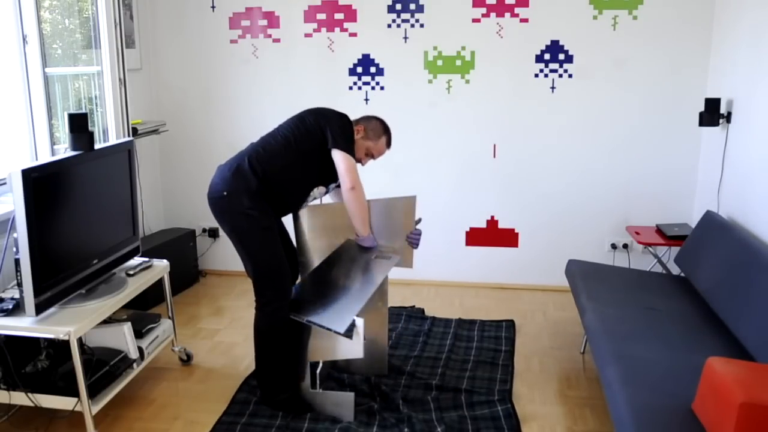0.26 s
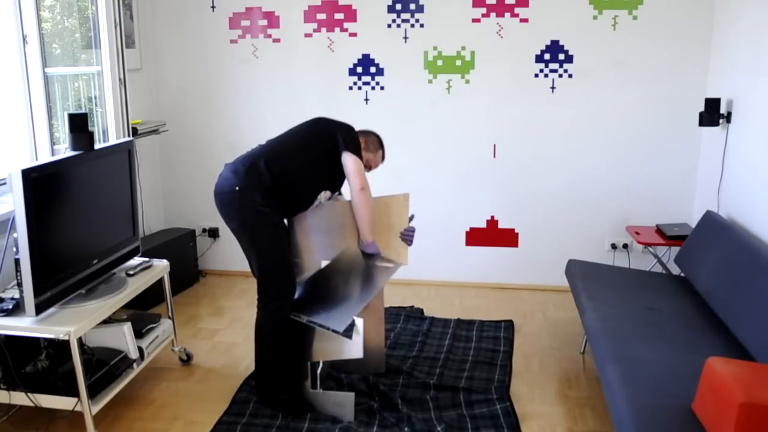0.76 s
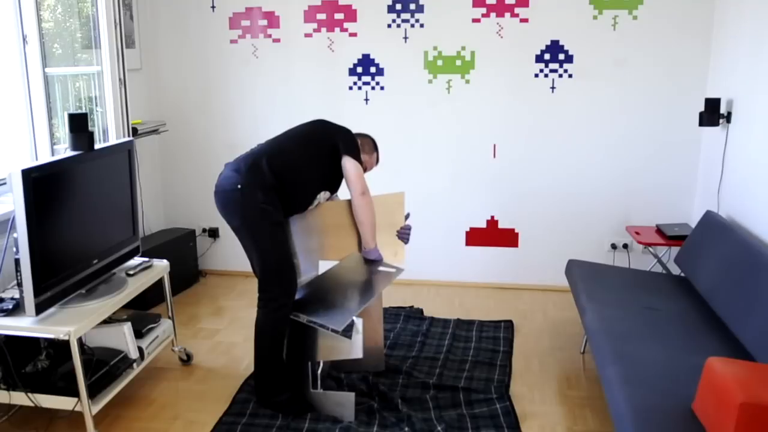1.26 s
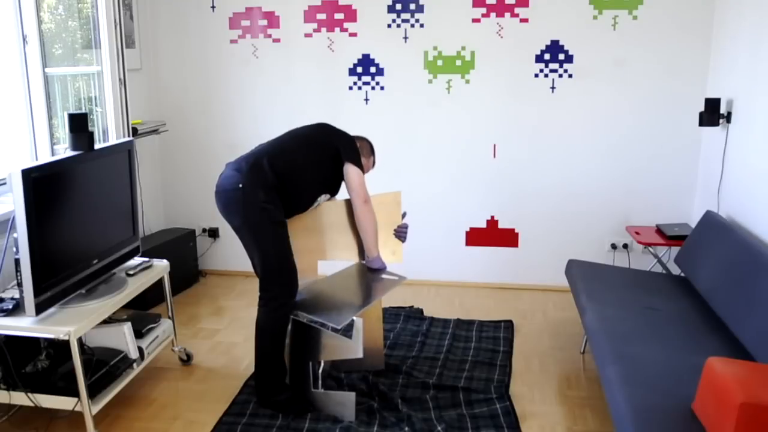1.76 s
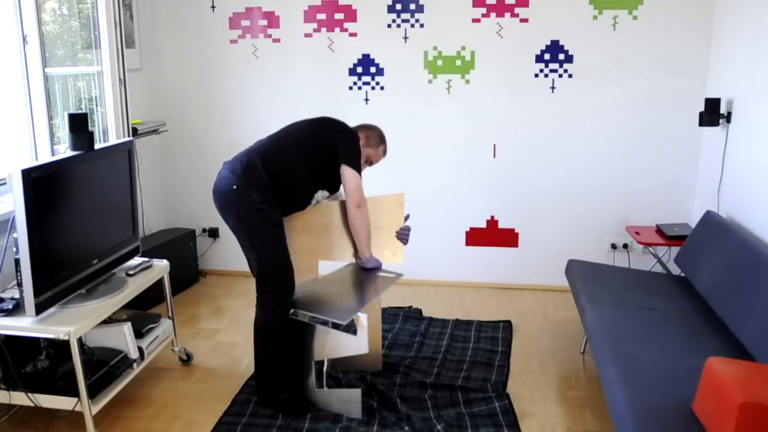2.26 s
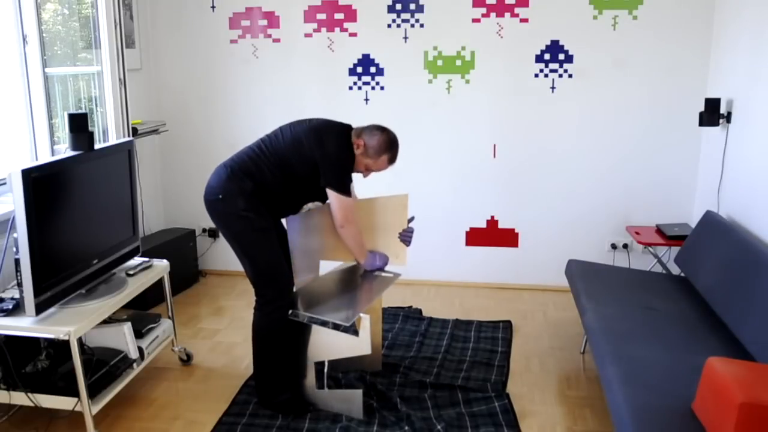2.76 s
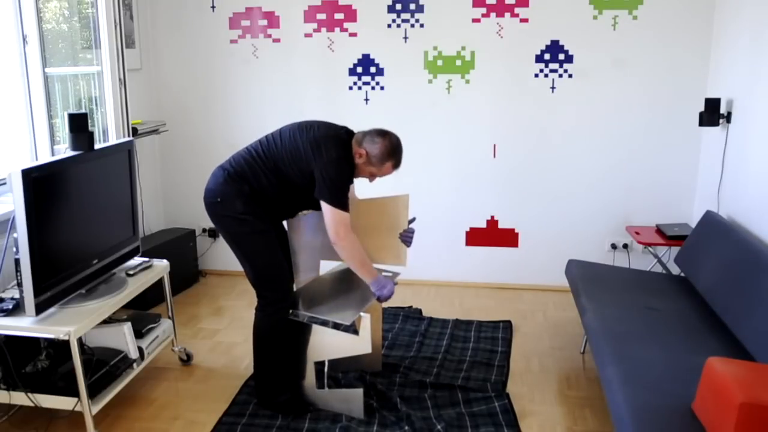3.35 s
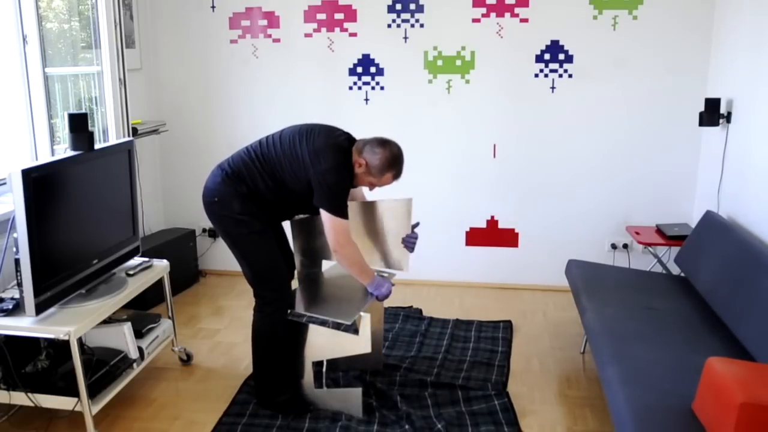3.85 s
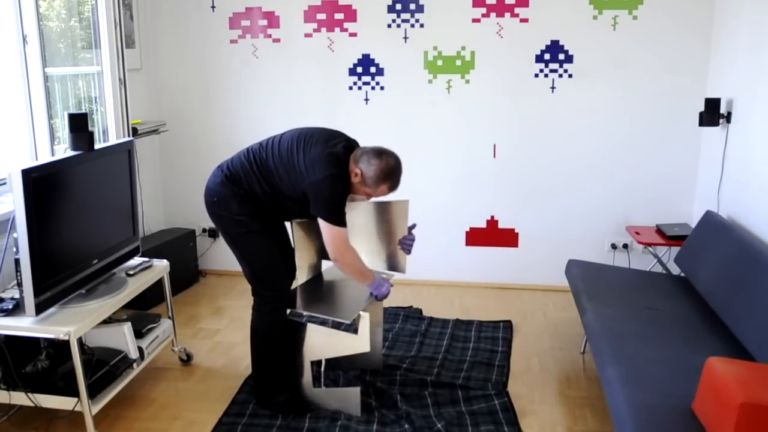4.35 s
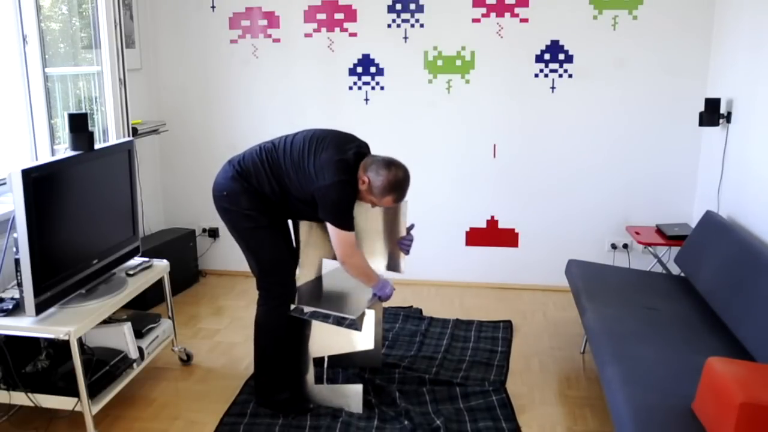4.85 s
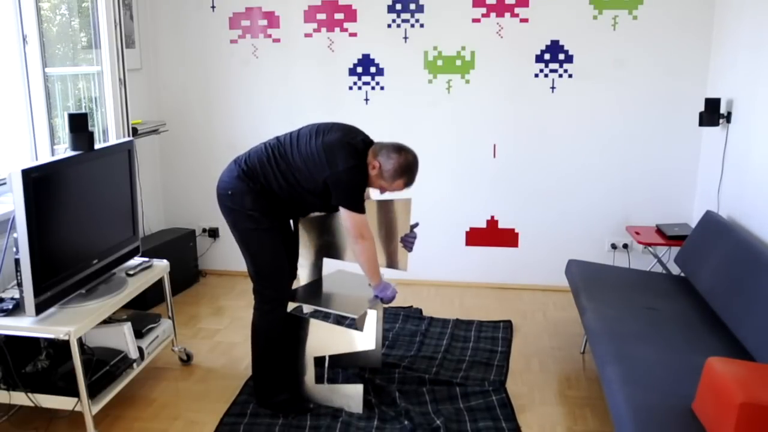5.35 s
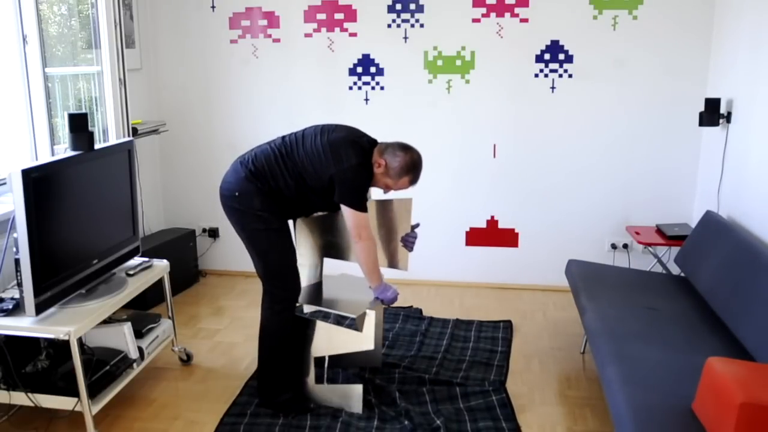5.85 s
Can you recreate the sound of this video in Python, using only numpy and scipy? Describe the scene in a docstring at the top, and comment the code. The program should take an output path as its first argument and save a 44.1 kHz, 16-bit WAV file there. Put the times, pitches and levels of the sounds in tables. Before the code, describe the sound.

A quiet room with a soft constant hush. Metal edges rub and catch in dry, uneven strokes while bending sheets click, pop and knock, each ringing for under half a second. Activity is light for the first second and a half, becomes irregular clanks, thins around four seconds, then builds to clustered knocks and loud closing bangs. The microphone sounds dull, mono and overloaded on peaks.

```python
"""A light scrape and a faint snap come first: thin sheet-metal panels bent and slid by hand in a living room.
Stick-slip friction scrapes the edges, and buckling snaps, knocks and at last hard bangs strike the sheets.
Both forces ring resonators (the clear modes) and decaying noise bands (the dense modes).
Noise bands make the low wobble of whole panels and the steady room hush.
A low-rate recorder dulls the treble, leaks a faint mirror of the band above it and clips the peaks."""
import sys
import numpy as np
from scipy import signal
from scipy.fft import rfft, irfft, next_fast_len
from scipy.io import wavfile

SR = 44100
rng = np.random.default_rng(int(sys.argv[2]) if len(sys.argv) > 2 else 0)


def how_loud(loudness_db):
    """Turn decibels into a plain amplitude multiplier (0 dB gives 1, 20 dB gives 10)."""
    steps = np.asarray(loudness_db, float) / 20
    return 10 ** steps


def log_audio(samples):
    """Write samples as a 16-bit WAV file to the path given in sys.argv[1]."""
    # one column per channel
    frames = np.atleast_2d(samples).T
    # limit to full scale, then quantise
    limited = np.clip(frames, -1, 1)
    pcm = np.round(limited * 32767).astype(np.int16)
    wavfile.write(sys.argv[1], SR, pcm)


N = 269451   # length [samples]
HOP = 64   # samples between envelope points
MIDDLE_HZ = 1185   # pitch at which boom and edge settings have no effect

# Impulses of buckling sheets, snaps and knocks: (time [s], relative peak [dB], boom re peak [dB],
# edge re peak [dB], favoured low pitch [Hz], favoured high pitch [Hz])
BLOWS = [(.049, -27.5, -3, 2, 344, 1855), (.347, -26.5, -2.5, -5, 442, 2560),
         (.469, -19, -7.5, -9.5, 1855, 2180), (1.131, -31, -4, -4.5, 1160, 1855),
         (1.416, -29, -0.5, 5, 293, 2090), (1.631, -11, -15, -12.5, 1160, 2200),
         (1.88, -13, -10.5, -6.5, 320, 1190), (2.16, -3.5, -11, -17.5, 760, 1160),
         (2.559, -23.5, -19, -2.5, 764, 1470), (2.61, -18.5, -1, -12, 490, 780),
         (2.705, -15.5, 2, 5.5, 1240, 1796), (2.884, -17.5, -2.5, -3, 260, 1275),
         (2.997, -10, -5, -10, 260, 950), (3.055, -21, 2, -18.5, 344, 854),
         (3.169, -33.5, -23, -0.5, 854, 3170), (3.234, -29, -3, -7, 453, 2850),
         (3.458, -19.5, 1.5, 7, 390, 1820), (3.62, -10.5, -19, -1.5, 596, 1276),
         (4.006, -35.5, 3.5, 12, 294, 3170), (4.14, -32.5, -4.5, 3.5, 738, 2110),
         (4.203, -23.5, 3.5, -10, 390, 666), (4.357, -6.5, -8, -11.5, 450, 1308),
         (4.554, -20, -2, -2.5, 400, 2290), (4.782, -2.5, -13.5, -1, 657, 1460),
         (4.94, -2.5, -5, -10, 312, 865), (5.036, -1.5, -1.5, -12.5, 442, 600),
         (5.627, -16, 9, -5.5, 440, 2300), (5.673, 6.5, -8, -11, 739, 1855),
         (5.888, 4.5, -6, -20, 950, 1486)]


def unit_rms(x):
    """Normalisation: divide a signal by the root of its mean power."""
    return x / np.sqrt(np.mean(x ** 2) + 1e-20)


def at_hz(points, hz, column=1):
    """Spectral interpolation: read a table column on a log-frequency axis."""
    points = np.array(points)
    return np.interp(np.log(hz), np.log(points[:, 0]), points[:, column])


def drift(step_s):
    """Slow random modulation: straight lines between random values one step apart."""
    return np.interp(np.arange(N) / SR / step_s, np.arange(400), rng.standard_normal(400))


def tilt_db(hz, boom_db, edge_db):
    """Spectral tilt: boom weights the low modes, edge the high ones, both fading out toward the middle."""
    boom_hz, edge_hz = 270, 3330   # full effect from here outward
    low = np.clip(np.log(MIDDLE_HZ / hz) / np.log(MIDDLE_HZ / boom_hz), 0, 1)
    high = np.clip(np.log(hz / MIDDLE_HZ) / np.log(edge_hz / MIDDLE_HZ), 0, 1)
    return low * boom_db + high * edge_db


def swell(s, held_s, up_db_per_s, down_db_per_s):
    """Exponential growth and decay of power, one row an event: rises to 1, holds, fades."""
    t = np.arange(0, N, HOP) / SR - np.asarray(s)[:, None]
    rise_db = up_db_per_s * np.minimum(t, 0)
    fall_db = down_db_per_s * np.maximum(t - held_s, 0)
    return how_loud(2 * (rise_db - fall_db))


def summed_db(level_db, swells, floor_db):
    """Incoherent addition: powers add at each envelope point, with the level in dB joined by straight lines."""
    power = how_loud(2 * level_db) @ swells + how_loud(2 * floor_db)
    return np.interp(np.arange(N), np.arange(0, N, HOP), 10 * np.log10(power))


def stick_slip():
    """Stick-slip friction: dense uneven slips of one edge over the other sheet, of either sign."""
    slips_per_s, spread_db = 2200, 3
    sizes = how_loud(spread_db * np.minimum(rng.exponential(1, N), 5))
    signs = rng.choice([-1, 1], N)
    slipping = rng.random(N) < slips_per_s / SR
    return unit_rms(sizes * signs * slipping)


def rub_db(hz):
    """Friction grows with pressure: strokes, chatter after blows and light resting contact at one pitch."""
    # Scraping strokes: (time of full pressure [s], held [s], relative level at the middle pitch [dB],
    # boom re level [dB], edge re level [dB])
    strokes = [(0, 0.063, -31.5, -3.5, 6), (.28, .02, -33.5, -10, 0.5), (.5, 0.34, -31.5, -13, 3),
               (0.788, 0.023, -19, -15.5, 5.5), (0.908, 0.019, -20, -14, 2), (0.971, 0.15, -25.5, -11, 3.5),
               (1.108, 0.017, -20.5, -13.5, -2), (1.32, 0.014, -31, -9, -1.5), (1.499, 0.056, -20, -20, 1),
               (1.608, 0.072, -17, -11.5, 3.5), (1.808, 0.034, -15.5, -5, -1), (2.249, 0.027, -21, -3, 0),
               (2.38, 0.024, -33.5, 0.5, -6), (2.619, 0.028, -24.5, 0.5, -9.5),
               (2.728, 0.028, -16.5, -15, -4), (3.06, 0.039, -22, -10, -31), (3.599, 0.042, -12, -11, 0.5),
               (3.77, .02, -24.5, -5, -0.5), (3.85, 0.048, -30.5, -5, -0.5), (4.22, 0.15, -32, -3, -3.5),
               (4.58, 0.016, -25.5, 1.5, 2.5), (4.65, 0.066, -29.5, -4.5, 1.5), (4.85, 0.11, -14.5, -3, -5),
               (5.168, 0.013, -17, -1, -3), (5.652, 0.025, -13, 0, -3.5), (5.684, 0.058, -1.5, -10, -3),
               (5.9, 0.045, -4.5, -5, -10.5)]
    press_s, let_go_db_per_s = 0.11, 113.5   # a stroke swells from rest in a set time, holds and eases off
    chatter_db, chatter_db_per_s = -6.5, 119   # after a blow the edges chatter: level re the blow, fading
    resting_db = -44   # the sheets always touch lightly
    s, held_s, level_db, boom_db, edge_db = np.transpose(strokes)
    blow_s, peak_db, blow_boom_db, blow_edge_db = np.transpose(BLOWS)[:4]
    press_db_per_s = (level_db[:, None] - resting_db) / press_s
    stroke_swells = swell(s, held_s[:, None], press_db_per_s, let_go_db_per_s)
    chatter_swells = swell(blow_s, 0, 1e5, chatter_db_per_s)   # all but instant rise
    stroke_db = level_db + tilt_db(hz, boom_db, edge_db)
    after_blow_db = peak_db + chatter_db + tilt_db(hz, blow_boom_db, blow_edge_db)
    return summed_db(np.r_[stroke_db, after_blow_db], np.r_[stroke_swells, chatter_swells], resting_db)


def rub_force(hz, slips):
    """Amplitude modulation: the stick-slip force as felt at one pitch."""
    return slips * how_loud(rub_db(hz))


def blow_force(hz, extra_db):
    """Impulsive excitation: one single-sample impulse a blow, weighted for one pitch."""
    s, peak_db, boom_db, edge_db = np.transpose(BLOWS)[:4]
    force = np.zeros(N)
    force[np.round(s * SR).astype(int)] = how_loud(peak_db + tilt_db(hz, boom_db, edge_db) + extra_db)
    return force


def favoured(hz, octaves):
    """Selective excitation: how near a pitch lies to those each blow favours, 0-1."""
    distance = np.log2(hz / np.array(BLOWS)[:, 4:]) / octaves
    return np.exp(-.5 * distance ** 2).max(axis=1)


def clear_modes(slips):
    """Modal resonance: scraping and blows ring the same modes; each snap's bend frees some until the next."""
    # The clearest sheet modes: (frequency [Hz], relative level [dB], t60 [s])
    sheet_modes = [(261, -13.5, 0.49), (317, -5, 0.53), (344, -12.5, 0.26), (442, -4.5, 0.43),
                   (596, -4, 0.32), (670.6, -7, 0.24), (739, -1.5, 0.37), (854, -10.5, 0.43),
                   (951, -3, 0.51), (1160, -3, 0.21), (1180, -5.5, 0.35), (1256, 0.5, 0.11),
                   (1396, -6, 0.31), (1486, 0.5, 0.15), (1627, -4, 0.33), (1781, 3, 0.097),
                   (1855, -6, 0.18), (1937, -6, 0.22), (2110, -2.5, 0.21), (2560, -19.5, 0.12),
                   (2680, -4, 0.12), (3170, -4.5, 0.16), (3296, -7.5, 0.25), (3740, -18.5, 0.14),
                   (4004, -8, 0.1)]
    rub_gain_db, blow_gain_db, strike_spread_db = -6.5, -22.5, 0.5
    free_rub_db, free_blow_db, free_octaves = 6, 16.5, 0.026
    clang = 0.12   # harder pushes ring these modes more, dB per dB of scraping level
    out = np.zeros(N)
    chance = rng.standard_normal((len(BLOWS), len(sheet_modes)))
    latest = np.maximum(np.searchsorted(np.array(BLOWS)[:, 0], np.arange(N) / SR) - 1, 0)
    clang_db = clang * (rub_db(MIDDLE_HZ) + 13.5)
    for k, (hz, level_db, t60) in enumerate(sheet_modes):
        radius = how_loud(-60 / (t60 * SR))
        angle = 2 * np.pi * hz / SR
        free = favoured(hz, free_octaves)
        rubbed = np.sqrt(1 - radius) * rub_force(hz, slips)   # keeps the steady level apart from t60
        rubbed *= how_loud(rub_gain_db + free_rub_db * free[latest] + clang_db)
        struck = blow_force(hz, blow_gain_db + free_blow_db * free + strike_spread_db * chance[:, k])
        feed = [0, how_loud(level_db) * np.sin(angle)]
        feedback = [1, -2 * radius * np.cos(angle), radius * radius]
        out += signal.lfilter(feed, feedback, rubbed + struck)
    return out


def wash(slips):
    """High modal density: modes too close to tell apart answer as decaying noise in third-octaves."""
    # Countless close modes of sheets and room: (frequency [Hz], relative colour [dB], t60 [s])
    dense_modes = [(110, -18, 1), (165.4, 1.5, 0.44), (300, 5.5, 0.4), (600, 2, 0.41), (1170, -3.5, 0.65),
                   (2390, 0, 0.32), (3010, -4.5, 0.26), (5250, -20, 0.5)]
    blow_gain_db, favour_db, favour_octaves = 30.5, 3, 0.096
    first_snap, snap_s = 0.52, 0.023   # extra onset of each answer, and its decay time
    patch_s, patchy_db = .04, 2.5   # the edge catches unevenly at each pitch
    shapes, bend_s = 3, .25   # bending crossfades from one set of modes to the next
    out = np.zeros(N)
    edges = 90 * 2 ** np.arange(0, 6.2, 1 / 3)
    t = np.arange(SR // 2) / SR
    white = rng.standard_normal((2, shapes, len(t)))
    turn = np.arange(N) / SR / bend_s - np.arange(shapes)[:, None]
    away = np.abs((turn + shapes / 2) % shapes - shapes / 2)
    share = np.sqrt(np.clip(1 - away, 0, 1))
    for k, (low, high) in enumerate(zip(edges, edges[1:])):
        hz = np.sqrt(low * high)
        decay = how_loud(-60 * t / at_hz(dense_modes, hz, column=2)) * (1 + first_snap * np.exp(-t / snap_s))
        band = signal.butter(2, [low, high], "band", fs=SR, output="sos")
        answer = signal.sosfilt(band, white[k % 2] * decay) / np.sqrt(np.sum(decay ** 2))
        rubbed = rub_force(hz, slips) * how_loud(patchy_db * drift(patch_s))
        struck = blow_force(hz, blow_gain_db + favour_db * favoured(hz, favour_octaves))
        force = (rubbed + struck) * how_loud(at_hz(dense_modes, hz))
        out += signal.oaconvolve(force * share, answer, axes=1)[:, :N].sum(axis=0)
    return out * np.sqrt(SR / 2 / MIDDLE_HZ)   # the level holds for a band this wide


def rumble(low_hz=75, high_hz=140, still_db=-54):
    """Forced low-frequency vibration: the slowest panel modes, pushed by the hands, as swelling noise."""
    # Wobbles of whole panels: (time of widest swing [s], level [dB])
    wobbles = [(.05, -47), (.92, -50), (1.46, -34.5), (1.89, -32), (2.2, -33.5), (2.75, -53), (3.03, -33),
               (3.66, -42), (4.4, -41.5), (4.95, -34), (5.12, -26.5), (5.73, -33), (5.94, -22.5)]
    up_db_per_s, down_db_per_s = 201.5, 63.5
    s, level_db = np.transpose(wobbles)
    band = signal.butter(2, [low_hz, high_hz], "band", fs=SR, output="sos")
    noise = unit_rms(signal.sosfilt(band, rng.standard_normal(N)))
    return noise * how_loud(summed_db(level_db, swell(s, 0, up_db_per_s, down_db_per_s), still_db))


def room_tone(level_db=-36.5):
    """Stationary coloured noise: the steady broad hush of the room and the microphone."""
    # Spectrum of the hush: (frequency [Hz], relative density [dB])
    hush = [(15, -36), (25, -5), (217, -9.5), (342, -7.5), (744, -5.5), (811, -7), (4380, -21), (5690, -59),
            (9640, -120)]
    hz = np.maximum(np.fft.rfftfreq(N, 1 / SR), 1)
    coloured = irfft(rfft(rng.standard_normal(N)) * how_loud(at_hz(hush, hz)), N)
    return how_loud(level_db) * unit_rms(coloured)


def scene():
    """Superposition: the panels over the room tone, as one channel."""
    slips = stick_slip()
    panels = clear_modes(slips) + how_loud(-4.5) * wash(slips) + rumble()
    return (panels + room_tone())[None]


def low_pass(x):
    """Removes everything above the highest recorded frequency."""
    return signal.sosfilt(signal.butter(12, 16000, fs=SR, output="sos"), x)


def record(dry, input_cut_hz=3700):
    """Sampling and imaging: a low rate dulls the treble, a faint mirror leaks above the band; peaks clip."""
    # Smoothing filter back up to the full rate: (frequency [Hz], gain [dB])
    smoothing = [(4200, -1.5), (5100, -5), (5500, -19), (6000, -11), (7000, -22.5), (8000, -34.5),
                 (9000, -49.5), (10000, -67.5), (11500, -100)]
    recorder_rate = SR / 4   # Hz
    x = signal.sosfilt(signal.butter(3, input_cut_hz, fs=SR, output="sos"), dry)
    x = signal.sosfilt(signal.butter(2, 36, "high", fs=SR, output="sos"), x)
    size = next_fast_len(N + SR // 4)
    hz = np.maximum(np.fft.rfftfreq(size, 1 / SR), 1)
    x = irfft(rfft(x, size) * (hz < recorder_rate / 2), size)
    x = x * (1 + 2 * np.cos(2 * np.pi * recorder_rate * np.arange(size) / SR))   # the band and its mirror
    smoothed = irfft(rfft(x) * how_loud(at_hz(smoothing, hz)), size)[:, :N]
    return low_pass(np.clip(smoothed, -1, 1))


dry = scene()
out = record(dry)
log_audio(out)
```